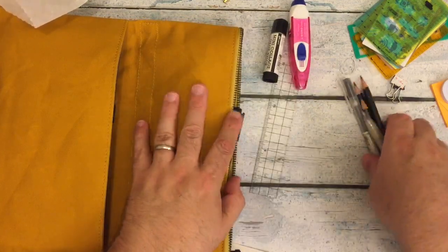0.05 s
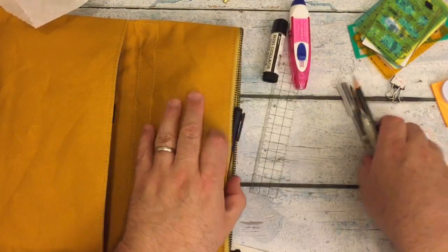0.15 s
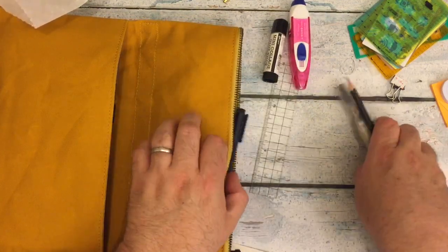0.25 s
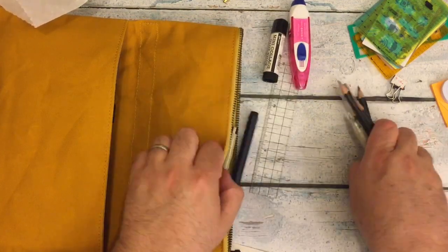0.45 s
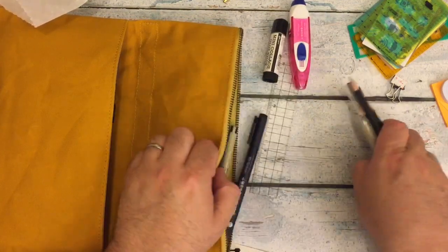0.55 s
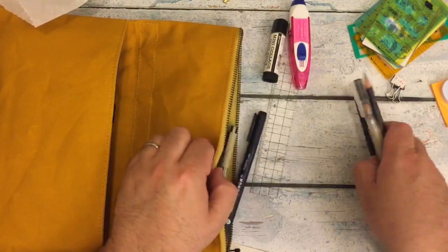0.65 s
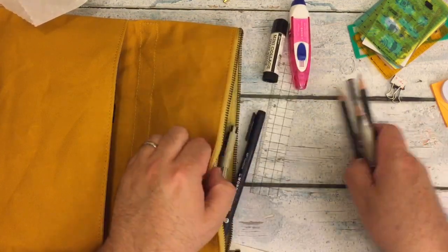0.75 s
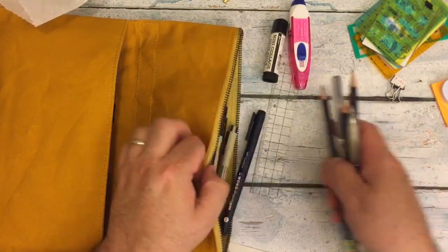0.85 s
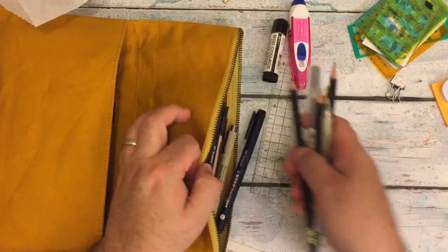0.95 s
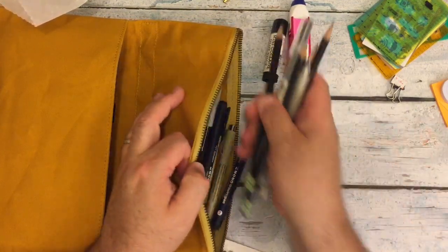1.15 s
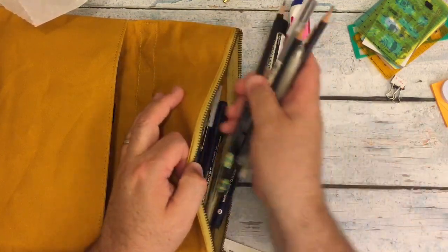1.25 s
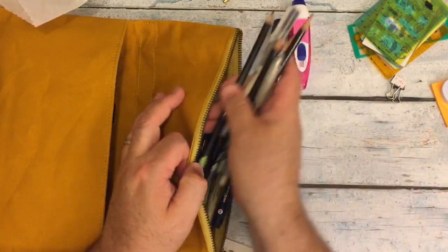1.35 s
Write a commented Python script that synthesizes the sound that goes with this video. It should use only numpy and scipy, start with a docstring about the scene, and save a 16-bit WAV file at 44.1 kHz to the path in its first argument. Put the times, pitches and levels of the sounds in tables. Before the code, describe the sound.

Pens slide, tick and scrape out of a leather case onto a wooden table for the first half second, one snapping down sharply at 0.2 seconds. A hand rubs the case, and two pens clack at 0.65. Near 0.9 a pen knocks lightly and the leather swishes, then pencils clink faintly around 1.1. Dull rubs and soft bumps close by 1.4 seconds, over a low room hum.

```python
"""Pens are pushed out of a leather case onto a wooden table while the other hand gathers pencils. In a small,
humming room the pens slide, tick and scrape past the zip, and the hands bump softly. At 0.2 s a pen cap snaps
sharply shut. A hand rubs the case, then a pen clacks against its neighbour. Near 0.9 s a pen knocks on the
table, the leather swishes and two pencils clink faintly. Dull rubs and soft bumps of the hands end the scene."""
import sys
import numpy as np
from scipy import signal
from scipy.fft import rfft, irfft
from scipy.io import wavfile

SR = 44100
rng = np.random.default_rng(int(sys.argv[2]) if len(sys.argv) > 2 else 0)


def master_out(mix):
    """Clip the mix to full scale and print it as 16-bit PCM to the path in sys.argv[1]."""
    frames = np.transpose(np.atleast_2d(mix))
    ceiling = np.clip(frames, -1, 1)
    pcm = np.round(ceiling * 32767).astype(np.int16)
    wavfile.write(sys.argv[1], SR, pcm)


N = 61739

# the room's steady noise: pitch_hz, level_db
AIR_COLOUR = [(25, -16), (55, -6.5), (85, -6), (120, 9.5), (170, 2), (240, 0.5), (380, -2.5), (520, -8.5),
              (800, -16.5), (1100, -12.5), (1600, -29), (4000, -38), (8000, -34.5), (16000, -39.5)]
# the notes of the room's hum: pitch_hz, level_db
HUM_NOTES = [(119.5, -58), (172, -64), (232, -61), (382, -68)]
# how long the room's echo takes to fall by 60 dB: pitch_hz, ring_s
ROOM_ECHO = [(150, 0.36), (600, .45), (2000, 0.29), (5000, 0.23), (9000, 0.3), (15000, .27)]
# how strongly the pens slide: time_s, level_db
SLIDE_LEVELS = [(0, -40), (.05, -42), (.07, -45), (0.098, -40), (0.128, -47.5), (0.177, -50), (.205, -41),
                (.24, -44), (.275, -39.5), (0.316, -38), (0.338, -46), (0.369, -41), (.41, -48),
                (.45, -52.5), (.48, -47), (.52, -62.5), (.62, -66)]
# the tone of pens on wood: pitch_hz, level_db
PEN_COLOUR = [(150, -32), (310, 6), (480, -5), (780, -5.5), (1000, 2.5), (1450, 0), (2060, 1.5),
              (2700, -5.5), (4000, 0), (4800, -11), (5800, -2.5), (7600, -18.5), (8900, -10.5),
              (10400, -33), (12600, -18.5), (16000, -21.5)]
# pitches the table top favours: pitch_hz, width_hz, boost_db
WOOD_PEAKS = [(980, 60, 5), (1715, 40, 6), (2100, 220, 4), (4024, 380, 4)]
# ticks of pens, pencils and zip teeth: start_s, level_db, pitch_hz, width_octaves
LIGHT_TICKS = [(0.0227, -28, 4700, 1.3), (0.0227, -36.5, 13000, 0.7), (0.0247, -26.5, 4300, 0.7),
               (.0325, -35, 6000, 2), (0.041, -30.5, 4100, 0.7), (.0443, -31, 3890, .7),
               (.078, -39, 3980, 1.8), (0.0952, -36.5, 3000, 1.8), (.1055, -38.5, 2400, 1.6),
               (0.1413, -41, 3800, 0.91), (.188, -38, 3000, 1.1), (0.1927, -25.5, 4400, 0.65),
               (.1927, -34, 2300, .35), (.2275, -26, 7000, 1.2), (.252, -32, 5000, .9),
               (0.2605, -31, 5380, 0.66), (0.3007, -28.5, 4800, 1.5), (0.341, -41, 5540, .3),
               (0.3545, -38, 3400, 1.2), (.3645, -38, 4800, 1.1), (0.382, -29, 4600, 0.95),
               (0.3963, -38, 5365, .35), (0.5457, -49.5, 2450, .25), (0.718, -51, 2300, 0.088),
               (0.748, -55.5, 6900, .8), (0.776, -55.5, 4950, 1.5), (.781, -60, 10500, .9),
               (0.88, -51, 3600, 0.25)]
# hands and case bumping the table: start_s, level_db, pitch_hz, decay_s
SOFT_BUMPS = [(0.029, -36.5, 308, .017), (0.059, -43, 111, 0.034), (0.143, -44.5, 117.3, 0.023),
              (.325, -51.5, 62, .03), (.79, -52.5, 48, 0.019), (0.868, -47, 144.3, 0.02),
              (.93, -50, 65.3, .035), (1.151, -53, 51.9, 0.023), (1.258, -44.5, 55, .028),
              (1.359, -42.5, 56.6, 0.02), (1.366, -50.5, 172.4, .025)]
# a pen dragging on wood: start_s, length_s, level_db, from_hz, to_hz
PEN_SCRAPES = [(.072, .054, -48.5, 1000, 1400), (.268, .011, -42, 1100, 1700)]
# the notes of the snapping pen cap: pitch_hz, level_db, ring_s
SNAP_NOTES = [(2230, -27.5, 0.014), (3274, -28.5, 0.022), (4210, -21, 0.0095), (4530, -28, 0.013),
              (5140, -32.5, .01), (6206, -22, .014), (8320, -11.5, .009), (9330, -10, .0075),
              (11200, -8, 0.004), (12150, -7, 0.005), (13300, -10.5, 0.0045), (15200, -14.5, .0035)]
# the tone of its crack: pitch_hz, level_db
SNAP_COLOUR = [(200, -20), (1400, -19.5), (3000, -2.5), (5500, 1.5), (7300, -1.5), (10000, -4.5),
               (14000, -6.5), (16000, -9)]
# the notes of the table under it: pitch_hz, level_db, ring_s
TABLE_NOTES = [(285, -39, 0.24), (332, -40, 0.33), (405, -38.5, 0.11), (680, -49.5, 0.089),
               (920, -39.5, 0.066)]
# a hand rubbing the case: peak_s, level_db, rise_s, decay_s
RUB_STROKES = [(.483, -47, 0.013, .016), (1.24, -59.5, 0.044, .05), (1.29, -63.5, .02, 0.01),
               (1.39, -64, .02, 0.047)]
# the dull tone of those rubs: pitch_hz, level_db
RUB_COLOUR = [(150, 1.5), (380, 1), (600, -4.5), (900, -19), (1120, 8.5), (1350, -20), (3000, -33),
              (12000, -66)]
# pitches the case favours: pitch_hz, width_hz, boost_db
CASE_PEAKS = [(940, 120, 4), (1340, 130, 6), (3250, 160, 4), (6080, 140, 4), (8820, 400, 3),
              (11900, 1100, 5.5)]
# the notes of pen hitting pen: pitch_hz, level_db, ring_s
CLACK_NOTES = [(660, -45.5, 0.1), (1593, -45.5, .035), (1993, -38, 0.05), (2966, -39, 0.031),
               (3915, -34, 0.05), (4420, -20.5, 0.011), (5450, -7.5, 0.0038), (6300, -24, 0.009),
               (8470, -24.5, 0.0053), (11840, -34, .005), (14900, -37, 0.0046)]
# the tone of that hit's crack: pitch_hz, level_db
CLACK_COLOUR = [(250, -14), (1100, -9.5), (2000, -8.5), (3400, -1), (5200, 6.5), (7300, -4.5), (10000, -12),
                (16000, -22)]
# the notes of a pen's dry knock on the table: pitch_hz, level_db, ring_s
KNOCK_NOTES = [(500, -43, .016), (1230, -27, .0085), (1650, -27.5, .0075), (6500, -45, .003)]
# the leather swishing: peak_s, level_db, rise_s, decay_s
SWISH_STROKES = [(.885, -54.5, .02, .02), (.951, -42.8, 0.013, 0.025), (1.01, -63, .02, 0.055)]
# the tone of the swish: pitch_hz, level_db
SWISH_COLOUR = [(150, -41), (380, 7), (680, -4.5), (1000, 5), (1600, 3.5), (2300, -4.5), (3200, -4),
                (5000, -12.5), (6300, -7.5), (9000, -28), (16000, -19)]
# the leather's airy hiss: peak_s, level_db, rise_s, decay_s
HISS_STROKES = [(.958, -50.3, 0.024, 0.046), (1.03, -58.5, 0.023, 0.069)]
# the tone of the hiss: pitch_hz, level_db
HISS_COLOUR = [(500, -33), (3000, 0.5), (6000, -1.5), (10300, -2.5), (16000, -4.5)]
# the notes of two pencils clinking: pitch_hz, level_db, ring_s
CLINK_NOTES = [(4080, -35, .014), (6600, -41, .007)]

CONTACT_S = .00024  # how quickly a hard hit builds up


def amp(db):
    """Turns decibels into a number to multiply by."""
    return 10 ** (np.asarray(db) / 20)


def unit(x):
    """Scales a sound to an average (rms) level of 1."""
    return x / np.sqrt(np.mean(x ** 2) + 1e-20)


def look_up(table, hz):
    """Reads a table at any pitch, blending between its rows."""
    pitches, values = np.transpose(table)
    return np.interp(np.log(hz + 1), np.log(pitches + 1), values)


def place(sound, start_s):
    """Puts a sound on a silent track as long as the scene."""
    return np.concatenate([np.zeros(round(start_s * SR)), sound, np.zeros(N)])[:N]


def tint(x, colour):
    """Turns each pitch up or down as a colour table says; the result has level 1."""
    hz = np.fft.rfftfreq(len(x), 1 / SR)
    return unit(irfft(rfft(x) * amp(look_up(colour, hz)), len(x)))


def resonate(x, peaks):
    """Lifts the pitches an object favours, keeping the overall level."""
    hz = np.fft.rfftfreq(N, 1 / SR)
    boost_db = sum(db / (1 + (2 * (hz - pitch) / width) ** 2) for pitch, width, db in peaks)
    return np.std(x) * unit(irfft(rfft(x) * amp(boost_db), N))


def tiny_slips(per_s, spread_db):
    """Friction: surfaces catch and let go in random clicks of uneven size."""
    size = amp(spread_db * np.minimum(rng.exponential(1, N), 4))
    return size * rng.choice([-1, 1], N) * (rng.random(N) < per_s / SR)


def ring(notes, start_s):
    """A struck object rings with several notes, each falling by 60 dB in its ring_s."""
    t = np.arange(SR // 4) / SR
    body = sum((-1) ** k * amp(db - 60 * t / ring_s) * np.sin(2 * np.pi * hz * t)
               for k, (hz, db, ring_s) in enumerate(notes))
    return place(body * (1 - np.exp(-t / CONTACT_S)), start_s)


def echo(x, delay_s=.004):
    """The walls send back many reflections; the high pitches die first."""
    hz, t, noise = signal.stft(rng.standard_normal(SR * 2 // 3), SR, nperseg=256)
    fade = amp(-60 * t / look_up(ROOM_ECHO, hz)[:, None])
    tail = signal.istft(noise * fade, SR, nperseg=256)[1]
    tail *= np.clip(np.arange(len(tail)) / SR / delay_s - 1, 0, 1)
    return signal.fftconvolve(x, tail / np.linalg.norm(tail))[:N]


def in_room(x, echo_db):
    """A sound together with its echo."""
    return x + amp(echo_db) * echo(x)


def room_tone(waver_depth=.28, air_db=-54.5):
    """The room's low noise and a hum that wavers."""
    t = np.arange(N) / SR
    hum = np.zeros(N)
    for hz, db in HUM_NOTES:
        drift = [unit(signal.resample(rng.standard_normal(24), N)) for _ in range(2)]
        waver = 1 + waver_depth * (drift[0] + 1j * drift[1])
        hum += amp(db) * np.sqrt(2) * (np.exp(2j * np.pi * hz * t) * waver).real
    return hum + amp(air_db) * tint(rng.standard_normal(N), AIR_COLOUR)


def slide(dull_hz=3500, bright_db=-40.5):
    """Pens stick and slip over the zip and the wood; light sliding sounds duller."""
    force_db = np.interp(np.arange(N) / SR, *np.transpose(SLIDE_LEVELS))
    slips = resonate(tint(tiny_slips(per_s=2400, spread_db=3.2), PEN_COLOUR), WOOD_PEAKS)
    dull = signal.sosfiltfilt(signal.butter(1, dull_hz, fs=SR, output="sos"), slips)
    treble = amp(.4 * np.minimum(force_db - bright_db, 0))  # fades once the force is below bright_db
    return in_room(amp(force_db) * (dull + treble * (slips - dull)), echo_db=-14)


def ticks(rise_s=.0003, decay_s=.0017):
    """Pens, pencils and zip teeth touch briefly, each making a burst of noise around one pitch."""
    out, t = np.zeros(N), np.arange(2048) / SR
    shape = (1 - np.exp(-t / rise_s)) * np.exp(-t / decay_s)
    shape_level = np.sqrt(np.mean((shape / shape.max()) ** 2))
    for start_s, db, hz, octaves in LIGHT_TICKS:
        tick = shape * rng.choice([-1, 1], len(t))
        # a gentle filter picks the band, then a wider, steeper one trims its sides
        for order, below, above in (1, octaves / 2, octaves / 2), (2, .4 + 1.3 * octaves, .3 + 1.3 * octaves):
            edges_hz = np.minimum([hz / 2 ** below, hz * 2 ** above], SR / 2 - 500)
            tick = signal.lfilter(*signal.butter(order, edges_hz, "band", fs=SR), tick)
        out += place(amp(db) * shape_level * unit(tick), start_s)
    return in_room(resonate(out, WOOD_PEAKS), echo_db=-10.5)


def bumps(rise_s=.0092):
    """Soft pushes from the hands and the case set the table top swinging briefly."""
    out, t = np.zeros(N), np.arange(SR // 3) / SR
    for start_s, db, hz, decay_s in SOFT_BUMPS:
        shape = (1 - np.exp(-(t / rise_s) ** 2)) * np.exp(-t / decay_s)
        out += place(amp(db) * shape / shape.max() * np.sin(2 * np.pi * hz * t), start_s)
    return out


def scrapes(width_hz=340):
    """A pen drags over the wood with a hollow note that rises as the touching point moves."""
    out = np.zeros(N)
    smooth = signal.butter(2, width_hz / 2, fs=SR, output="sos")
    for start_s, length_s, db, from_hz, to_hz in PEN_SCRAPES:
        progress = np.arange(0, 1, 1 / (length_s * SR))
        glide = np.exp(2j * np.pi * np.cumsum(from_hz + (to_hz - from_hz) * progress) / SR)
        noise = rng.standard_normal(N) + 1j * rng.standard_normal(N)
        roughness = signal.sosfilt(smooth, noise)[-len(progress):]
        swell = np.sin(np.pi * progress)
        out += place(amp(db) * unit((roughness * glide).real * swell), start_s)
    return in_room(out, echo_db=-14)


def crack(start_s, colour, decay_s, echo_db):
    """A hard hit gives a very short burst of noise, which the room spreads into a smooth wash."""
    t = np.arange(SR // 4) / SR
    shape = np.exp(-t / decay_s) * (1 - np.exp(-t / CONTACT_S))
    burst = place(shape * tint(rng.choice([-1., 1.], len(t)), colour), start_s)
    click = tint(place([1.], start_s), colour)
    return burst + amp(echo_db) * np.std(burst) * echo(click)


def snap(start_s=.2113, bounce_s=.00187):
    """A pen cap snaps shut with two quick contacts, cracking and ringing each time; the table rings too."""
    pen, cracks = np.zeros((2, N))
    for hit_s, db in (start_s, 5), (start_s + bounce_s, 3):
        pen += amp(db) * ring(SNAP_NOTES, hit_s)
        cracks += amp(db - 14) * crack(hit_s, SNAP_COLOUR, decay_s=.001, echo_db=-5)
    table = ring(TABLE_NOTES, start_s)
    return in_room(pen, echo_db=-19.5) + cracks + in_room(table, echo_db=-10)


def leather(strokes, colour):
    """Rubbing the leather case makes fine friction that swells and dies away with each stroke."""
    t = np.arange(N) / SR
    force = np.zeros(N)
    for peak_s, db, rise_s, decay_s in strokes:
        before, after = np.minimum(t - peak_s, 0), np.maximum(t - peak_s, 0)
        force += amp(db) * np.exp(-(before / rise_s) ** 2 / 2 - after / decay_s)
    friction = resonate(tint(tiny_slips(per_s=3800, spread_db=3), colour), CASE_PEAKS)
    return in_room(force * friction, echo_db=-7.5)


def clack(start_s=.6491):
    """One pen hits its neighbour: a dry crack and a short ring."""
    burst = amp(-30.5) * crack(start_s, CLACK_COLOUR, decay_s=.0022, echo_db=-4.5)
    return burst + in_room(ring(CLACK_NOTES, start_s), echo_db=-16.5)


def knock():
    """A pen taps the table with a dull, short ring."""
    return in_room(ring(KNOCK_NOTES, start_s=.8607), echo_db=-13)


def clink():
    """Two pencils touch and ring faintly."""
    return in_room(ring(CLINK_NOTES, start_s=1.0604), echo_db=-7)


def scene():
    """Adds all the sounds together in one channel."""
    opening = room_tone() + slide() + ticks() + bumps() + scrapes() + snap()
    middle = leather(RUB_STROKES, RUB_COLOUR) + clack() + knock()
    swish = leather(SWISH_STROKES, SWISH_COLOUR) + leather(HISS_STROKES, HISS_COLOUR)
    return (opening + middle + swish + clink())[None]


def record(dry, ceiling=.85, top_hz=16050):
    """Rounds off the loudest peaks and removes the very highest pitches."""
    rounded = dry / (1 + (dry / ceiling) ** 6) ** (1 / 6)
    low_pass = signal.firwin(255, top_hz, window=("kaiser", 9), fs=SR)
    return signal.oaconvolve(rounded, low_pass[None], "same")


dry = scene()
out = record(dry)
master_out(out)
```